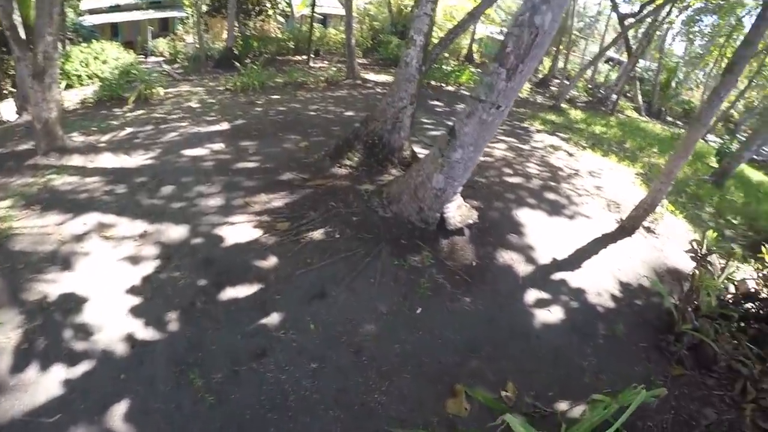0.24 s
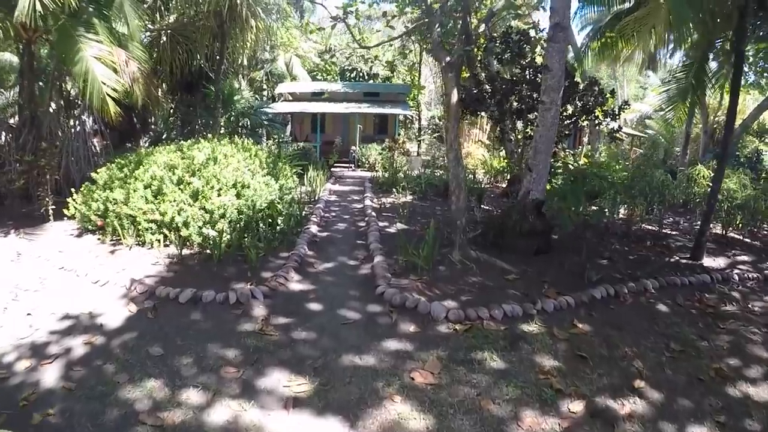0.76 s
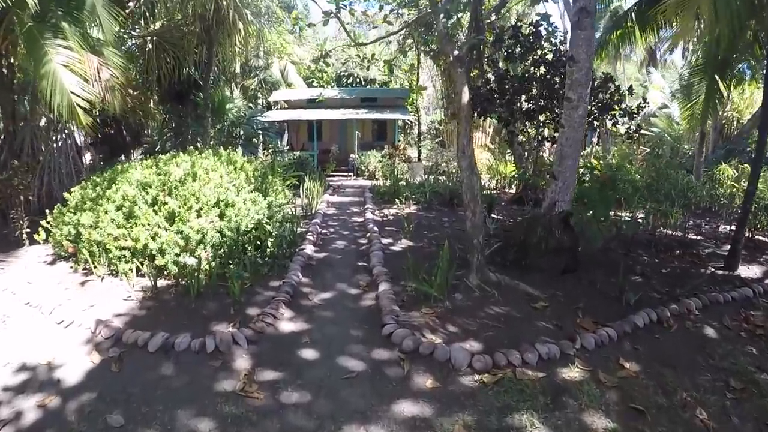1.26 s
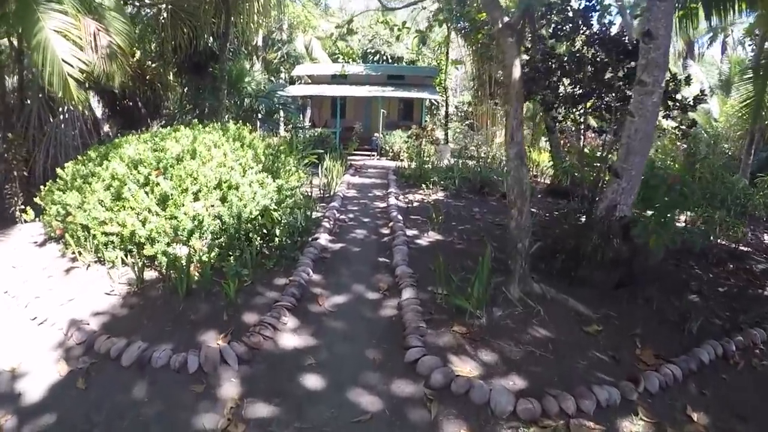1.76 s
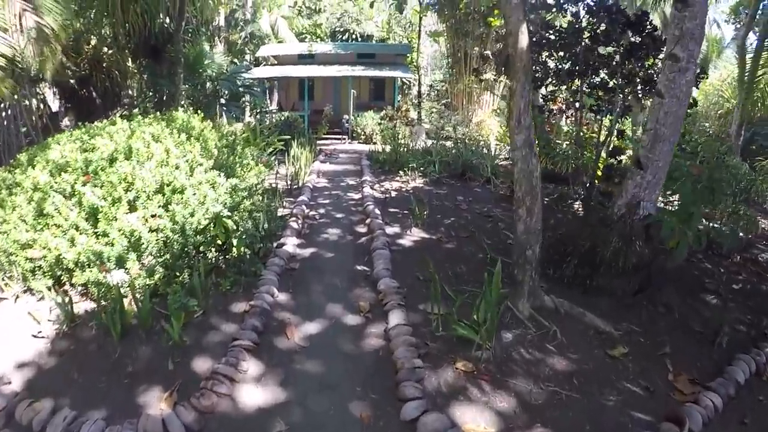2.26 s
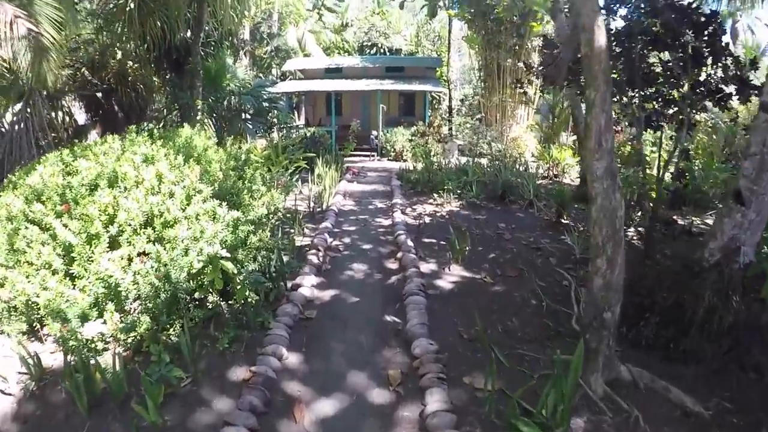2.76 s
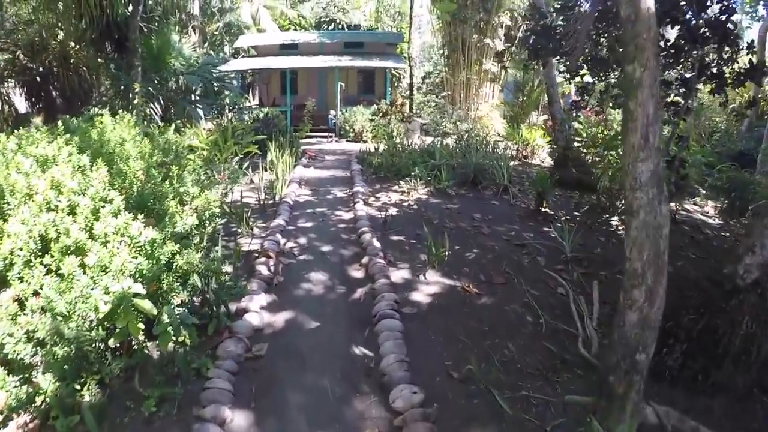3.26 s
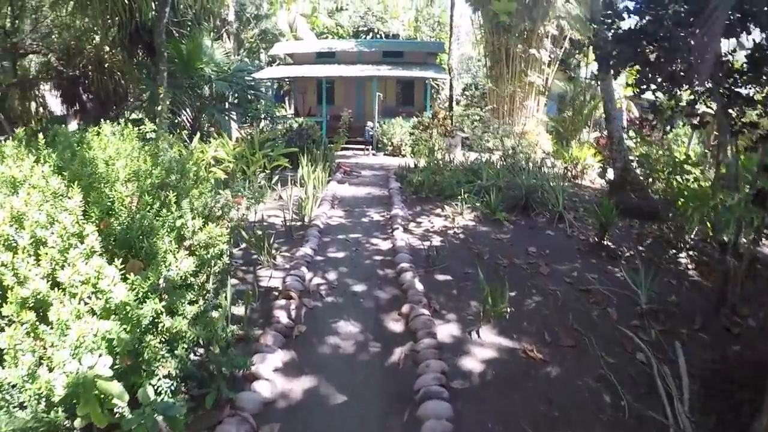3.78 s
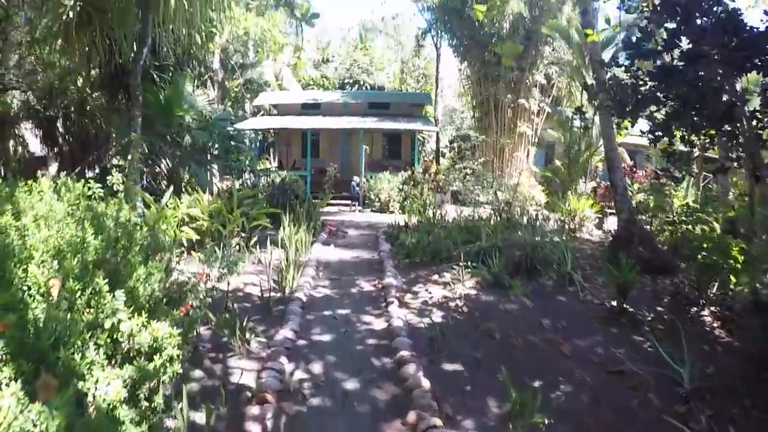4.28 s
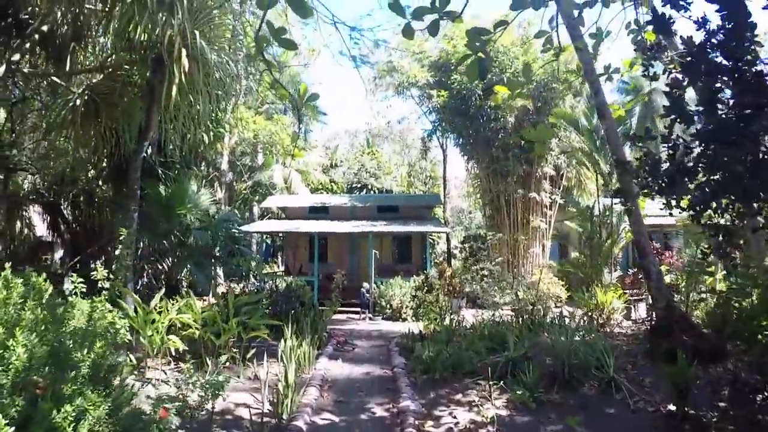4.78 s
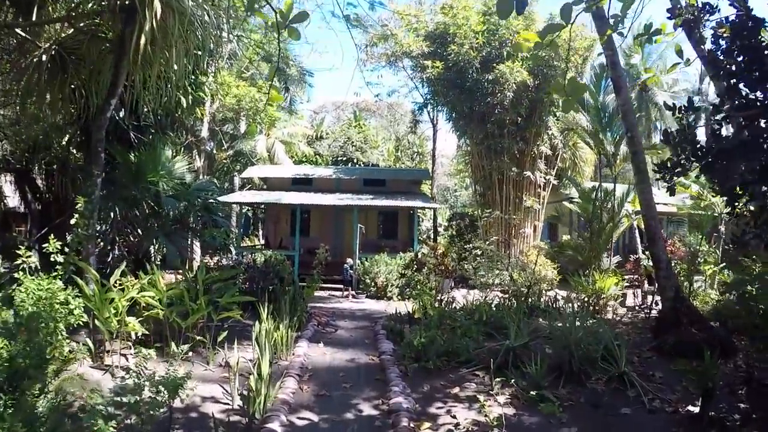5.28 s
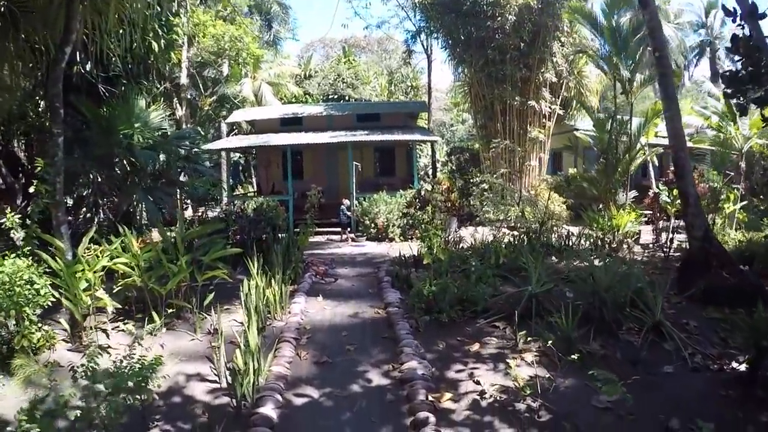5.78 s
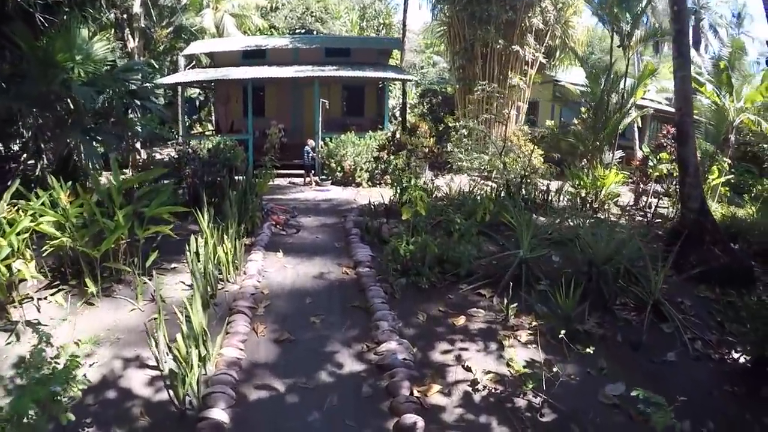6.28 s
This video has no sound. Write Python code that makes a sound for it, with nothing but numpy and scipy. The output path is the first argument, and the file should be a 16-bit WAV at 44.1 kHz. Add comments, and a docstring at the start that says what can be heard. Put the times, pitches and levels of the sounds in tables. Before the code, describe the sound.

For about six and a half seconds someone walks steadily on packed dirt outdoors, heard very close through a body-worn microphone. A soft, even hiss and a very thin high whine run throughout. The first thump lands at 0.1 s, the next at 0.8, then roughly every half second, through 1.4, 1.9, 2.4, 2.9, 3.5, 4.0, 4.6, 5.1, 5.7 and 6.2 s, the last slightly softer. Each is a deep, dull, short boom with a lighter forefoot push and settling wobble, a faint grit crunch and low strap rub. Weaker jolts fall between, notably near 4.4 and 5.5 s. Small dry plastic ticks come irregularly: a clear one at 0.85, others around 1.7, 2.4, 3.0, 3.3, 3.8, 4.05 and 5.5 s. Tiny crackly cloth brushes pass at 2.85 and 3.3 s. The sound is dry, with no echo.

```python
"""A soft even hiss (coloured noise) and a thin whine (resonant noise) last throughout in a quiet garden.
Someone walks a packed dirt path wearing a camera: heel, then forefoot, then settling weight push on a
damped low mode of the body and give dull thumps. Around each step the camera trembles, the strap rubs
and grit crunches, all as noise under envelopes. Now and then, between steps or right at a heel strike,
the mount ticks (decaying sines, a trace of noise); cloth brushes twice as coloured random cracks."""
import sys
import numpy as np
from scipy import signal
from scipy.fft import rfft, irfft
from scipy.io import wavfile

SR = 44100
rng = np.random.default_rng(int(sys.argv[2]) if len(sys.argv) > 2 else 0)


def generate_wav(sig):
    """Save sig (samples, or channels by samples) to the path in sys.argv[1] as 16-bit PCM at SR."""
    pcm = np.round(np.clip(np.atleast_2d(sig).T, -1, 1) * 32767).astype(np.int16)
    wavfile.write(sys.argv[1], SR, pcm)


N = 288414
TIME = np.arange(N) / SR

# Footfalls. Each row: heel strike in seconds, heel force in dB, forefoot delay in seconds,
# forefoot force in dB, settling force in dB, grit level in dB.
STEPS = [(0.144, 2.0, 0.055, -8, -24, -55), (0.835, 2.5, 0.037, -7.5, -11, -52.5),
         (1.379, 3, 0.046, -3.5, -24.5, -54), (1.888, 3, 0.049, -6.5, -5.5, -54.5),
         (2.446, 2.5, 0.037, -9, -16, -55.5), (2.947, 3.5, 0.051, -21, -7, -52),
         (3.49, 2.5, 0.041, -10, -17.5, -56.5), (4.02, 2.5, 0.051, -5.5, -10, -54),
         (4.577, 2, 0.0468, -10, -15.5, -56.5), (5.129, 1.5, 0.049, -5, -7.5, -54),
         (5.678, 1.4, 0.041, -7.5, -15, -56.5), (6.19, -0.5, 0.063, -26, -11.5, -57)]
SETTLE_DELAY_S = 0.102  # from the heel strike to the settling of the weight


def from_db(db):
    """Level law: decibels to an amplitude gain."""
    return 10 ** (np.asarray(db) / 20)


def rms_one(x):
    """Normalisation of power: scale to unit rms."""
    return x / np.sqrt(np.mean(x ** 2) + 1e-20)


def coloured(x, spectrum):
    """Spectral shaping: weight the Fourier bins by levels interpolated over log frequency; rms 1."""
    hz, level_db = np.transpose(spectrum)
    bins = np.maximum(np.fft.rfftfreq(N, 1 / SR), 1)
    gain = from_db(np.interp(np.log(bins), np.log(hz), level_db))
    return rms_one(irfft(rfft(x) * gain, N))


def resonance(x, hz, width_hz):
    """Damped oscillator: a pole pair whose radius sets the bandwidth, with unit gain at its top."""
    radius = np.exp(-np.pi * width_hz / SR)
    numerator = np.array([1, 0, -1]) * (1 - radius * radius) / 2
    denominator = [1, -2 * radius * np.cos(2 * np.pi * hz / SR), radius * radius]
    return signal.lfilter(numerator, denominator, x + 1e-18)


def swell(at, width):
    """Gaussian pulse: a smooth bell in time, of height 1."""
    return np.exp(-.5 * np.minimum(((TIME - at) / width) ** 2, 100))


def burst(at, rise, fall):
    """Transient envelope: a quick linear rise, then exponential decay."""
    age = np.maximum(TIME - at, 0)
    attack = np.minimum(age / rise, 1)
    return attack * np.exp(-np.minimum(np.maximum(age - rise, 0) / fall, 50))


def grains(per_s, size_db):
    """Random impulse process: little cracks at chance times, of either sign and uneven size."""
    present = rng.random(N) < per_s / SR
    sign = rng.choice([-1, 1], N)
    return present * sign * from_db(size_db * np.minimum(rng.exponential(1, N), 3))


def body(force, sway_hz=32.46, sway_width_hz=34.2, low_cut_hz=17.73):
    """Forced vibration: blows drive one damped low mode; the microphone sheds the slowest motion."""
    low_cut = signal.butter(4, low_cut_hz, "high", fs=SR, output="sos")
    return resonance(signal.sosfilt(low_cut, -force), sway_hz, sway_width_hz)


def background(air_db=-61, whine_hz=8360, whine_db=-82.5, whine_width_hz=55):
    """Stationary noise: a coloured hiss of air and microphone, and a narrow resonance as electronic whine."""
    # Spectrum of the hiss. Each row: frequency in Hz, relative level in dB per Hz.
    air_spectrum = [(90, 7.5), (160, 7.5), (300, 1.5), (600, -2.5), (1000, -5.5), (1350, -4), (1700, -6),
                    (2300, -5.5), (3000, -9.5), (5000, -11.5), (7000, -15.5), (10000, -19), (13500, -21.5),
                    (15500, -30)]
    air = from_db(air_db) * coloured(rng.standard_normal(N), air_spectrum)
    whine = rms_one(resonance(rng.standard_normal(N), whine_hz, whine_width_hz))
    return air + from_db(whine_db) * whine


def wobble(rest_db=-51, step_db=-38, lag=0.012, spread=0.093, top_hz=64, sway_hz=38, sway_width_hz=50):
    """Random vibration: low-passed noise drives the body mode and grows around each footfall."""
    shaking = sum(swell(step[0] + lag, spread) for step in STEPS)
    low_pass = signal.butter(5, top_hz, fs=SR, output="sos")
    tremble = signal.sosfilt(low_pass, rng.standard_normal(N))
    level = from_db(rest_db) + from_db(step_db) * shaking
    return rms_one(body(tremble, sway_hz, sway_width_hz)) * level


def strap(rub_db=-63, lag=0.054, spread=.06):
    """Friction noise: the strap rubs dully while the body takes the weight."""
    # Spectrum of the rubbing. Each row: frequency in Hz, relative level in dB per Hz.
    rub_spectrum = [(40, -13.5), (90, -6.5), (130, -2), (200, -14), (350, -17.5), (700, -28), (2000, -43.5)]
    loaded = sum(swell(step[0] + lag, spread) for step in STEPS)
    return from_db(rub_db) * loaded * coloured(rng.standard_normal(N), rub_spectrum)


def cloth():
    """Friction as random impulses: short, bright, crackly brushes as the leg swings through."""
    # Brushes. Each row: centre in seconds, level in dB, half length in seconds.
    brushes = [(2.853, -60, 0.0074), (3.338, -59.5, 0.011)]
    # Spectrum of the cloth. Each row: frequency in Hz, relative level in dB per Hz.
    cloth_spectrum = [(700, -16), (1500, -2), (2900, 5), (3800, -7), (4700, 1), (6000, -11), (8200, -5),
                      (10000, -23), (15000, -23)]
    stroke = sum(from_db(level_db) * swell(at, half) for at, level_db, half in brushes)
    return coloured(grains(per_s=1500, size_db=2.5), cloth_spectrum) * stroke


def mount_ticks(rise=0.00044, knock_hz=1050, knock_s=0.00062, knock_db=-3, chatter_db=-16, chatter_s=.003):
    """Modal superposition: the plastic mount slips and rings, with a dull knock and a trace of chatter."""
    # Ticks. Each row: start in seconds, level in dB, extra level of the knock in dB, pitch factor.
    ticks = [(.073, -55, 6, 1.04), (.849, -43, -5, 0.95), (1.67, -55, 9, 1.0), (2.423, -54, -4, 0.97),
             (2.947, -57, 0, 1.0), (2.9777, -51, 18, 0.99), (3.33, -47.5, 3, 1.04), (3.335, -57, -12, 1),
             (3.835, -50, 12, 0.97), (4.051, -49.5, -12, 0.99), (5.479, -55, -3, 0.97)]
    # Modes of the mount. Each row: frequency in Hz, relative level in dB, 60 dB decay time in seconds.
    modes = [(1350, -6.5, 0.032), (1926, -6.5, 0.023), (2377, 1.5, 0.028), (2650, -25, 0.0062),
             (5100, -21.5, .006)]
    out, age = np.zeros(N), np.arange(SR // 25) / SR
    onset = np.minimum(age / rise, 1)
    for at, level_db, dull_db, pitch in ticks:
        tick = np.zeros(len(age))
        for hz, mode_db, t60 in modes:
            decay = from_db(mode_db + rng.normal(0, 1) - 60 * age / t60)  # uneven by about 1 dB
            tick += decay * np.sin(2 * np.pi * (hz * pitch * age + rng.random()))
        knock = np.exp(-age / knock_s) * np.sin(2 * np.pi * knock_hz * age)
        tick += from_db(knock_db + dull_db) * knock
        tick += from_db(chatter_db) * np.exp(-age / chatter_s) * rng.standard_normal(len(age))
        start = int(at * SR)
        out[start:start + len(age)] += from_db(level_db) * onset * tick
    return out


def grit(lead_s=0.004, rise=0.0078, fall=0.02, roll_db=-12, roll_fall=0.033):
    """Granular fracture: tiny grains give way from just before the heel's full force, then die out."""
    # Spectrum of the grit. Each row: frequency in Hz, relative level in dB per Hz.
    grit_spectrum = [(120, 6.5), (300, 5.5), (700, -0.5), (1300, -1), (2400, -7.5), (3500, -14),
                     (6000, -19.5), (14000, -32.5)]
    load = np.zeros(N)
    for at, *_, grit_db in STEPS:
        start = at - lead_s
        crunch = burst(start, rise, fall) + from_db(roll_db) * burst(start, rise, roll_fall)
        load += from_db(grit_db) * crunch
    return coloured(grains(per_s=9000, size_db=2.5), grit_spectrum) * load


def sole_roll(forefoot_db=-61, settling_db=-60, lag=0.0074, spread=0.016):
    """Granular compaction: dirt packs duller under forefoot and settling weight, louder for a harder push."""
    # Spectrum of the packing dirt. Each row: frequency in Hz, relative level in dB per Hz.
    packing_spectrum = [(80, -4.5), (200, -3), (450, -0.5), (700, -0.5), (1200, -16.5), (2500, -17.5),
                        (6000, -26), (14000, -33.5)]
    load = np.zeros(N)
    for at, _, roll, roll_db, settle_db, _ in STEPS:
        # halved decibels: the crunch grows as the square root of the push
        load += from_db(forefoot_db + roll_db / 2) * swell(at + roll + lag, spread)
        load += from_db(settling_db + settle_db / 2) * swell(at + SETTLE_DELAY_S + lag, spread)
    return coloured(grains(per_s=2800, size_db=6.5), packing_spectrum) * load


def fizz(thumps, fizz_db=-67, centre_hz=11500, width_hz=4000):
    """Amplitude modulation: faint high noise follows the size of the thump wave."""
    hiss = rms_one(resonance(rng.standard_normal(N), centre_hz, width_hz))
    return from_db(fizz_db) * np.abs(thumps) * hiss


def footfalls(heel_s=0.0047, forefoot_s=0.0043, settle_s=0.0085):
    """Impulsive excitation: smooth pushes of each step, and lighter jolts, drive the body's low mode."""
    # Jolts of the camera, most as the rear foot pushes off.
    # Each row: centre in seconds, force in dB, contact time in seconds.
    jolts = [(0.053, -23.5, 0.0028), (0.641, -21, 0.0026), (1.192, -24.5, 0.003), (1.672, -22, 0.0018),
             (1.872, -20.5, 0.0012), (2.285, -14.5, 0.005), (2.803, -19, 0.0075), (3.337, -18.5, 0.0032),
             (3.827, -21.5, 0.002), (4.434, -8, 0.0098), (5.542, -11, 0.013), (5.976, -19.5, 0.0024),
             (6.094, -17.5, 0.0041), (6.176, -23.5, 0.00074)]
    swing_lead_s, swing_scatter_s, swing_db, swing_s = 0.051, 0.011, -25, 0.0078
    graze_lead_s, graze_db, graze_s = 0.013, -30.5, 0.0025
    force = np.zeros(N)
    for at, heel_db, roll, roll_db, settle_db, _ in STEPS:
        # the leg swings through, loosely timed before the heel
        swing_at = at - swing_lead_s + swing_scatter_s * rng.standard_normal()
        force += from_db(swing_db) * swell(swing_at, swing_s)
        # the heel's edge grazes the ground, then the heel lands
        force += from_db(graze_db) * swell(at - graze_lead_s, graze_s)
        force += from_db(heel_db) * swell(at, heel_s)
        force += from_db(roll_db) * swell(at + roll, forefoot_s)
        force += from_db(settle_db) * swell(at + SETTLE_DELAY_S, settle_s)
    for at, level_db, contact_s in jolts:
        force += from_db(level_db) * swell(at, contact_s)
    return body(force)


def scene():
    """Linear superposition: every source adds at the one microphone."""
    thumps = footfalls()
    feet = thumps + fizz(thumps) + grit() + sole_roll()
    gear = wobble() + strap() + mount_ticks() + cloth()
    return (feet + gear + background())[None]


def record(dry, cutoff_hz=15500):
    """Band limiting: an elliptic low-pass cuts the top steeply."""
    low_pass = signal.ellip(10, .1, 80, cutoff_hz, fs=SR, output="sos")
    return signal.sosfilt(low_pass, dry)


dry = scene()
out = record(dry)
generate_wav(out)
```